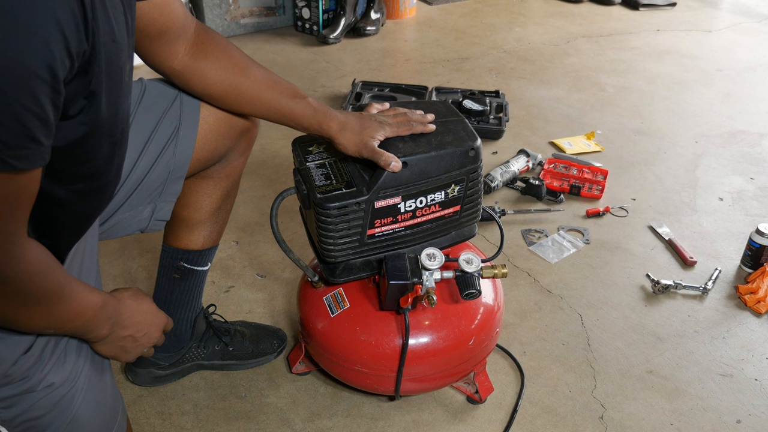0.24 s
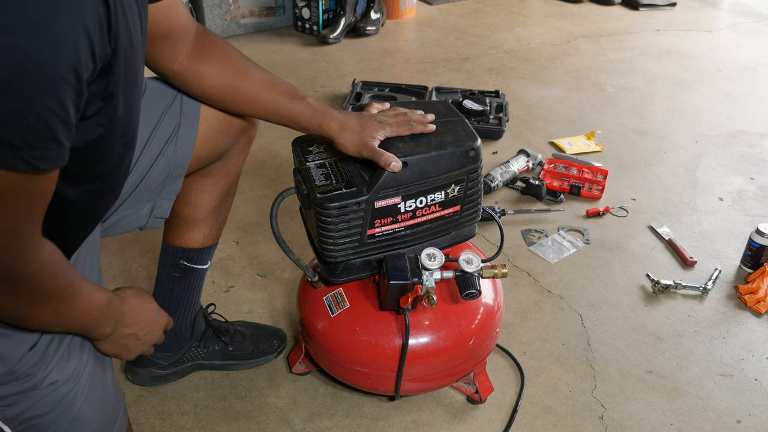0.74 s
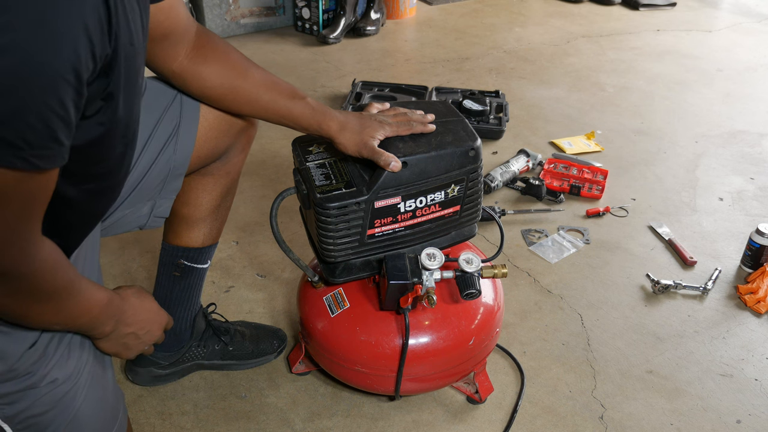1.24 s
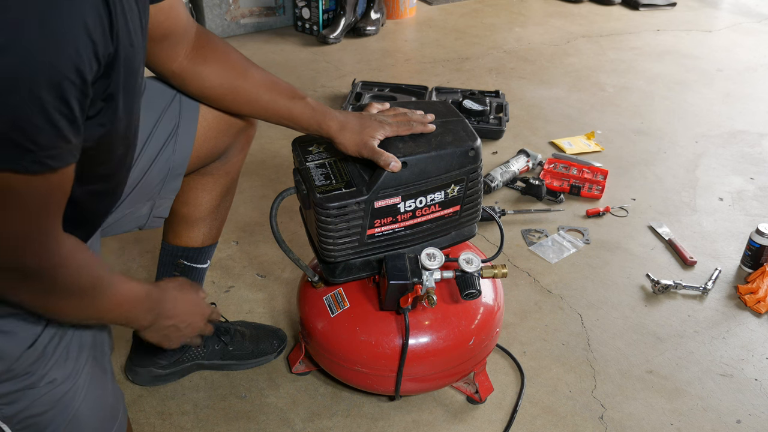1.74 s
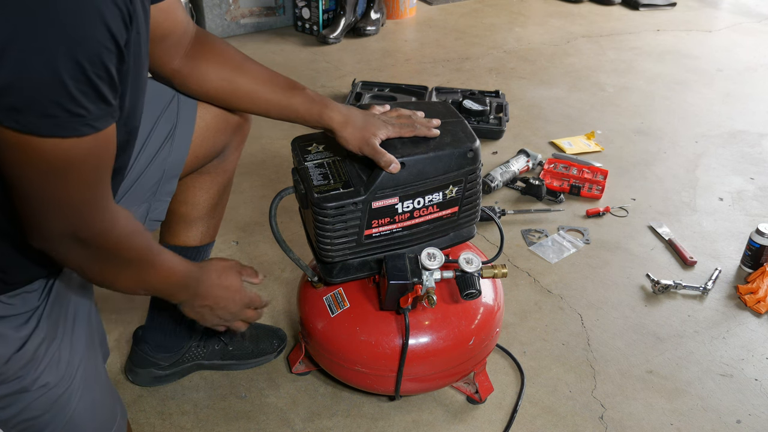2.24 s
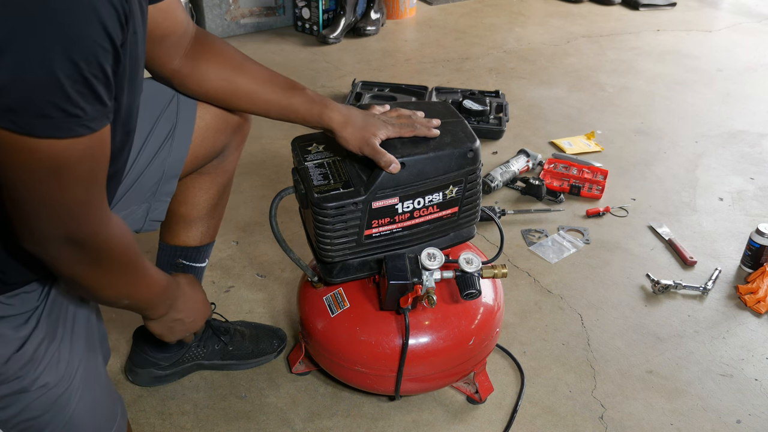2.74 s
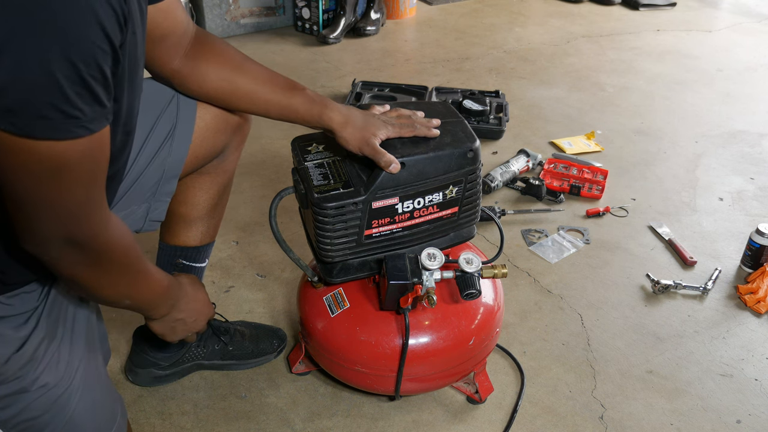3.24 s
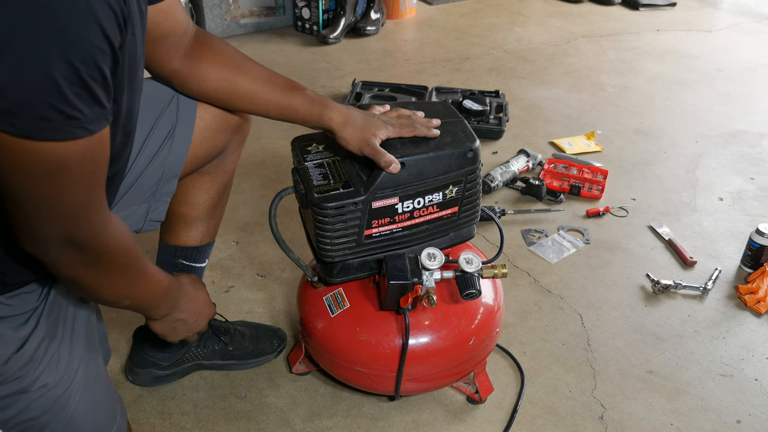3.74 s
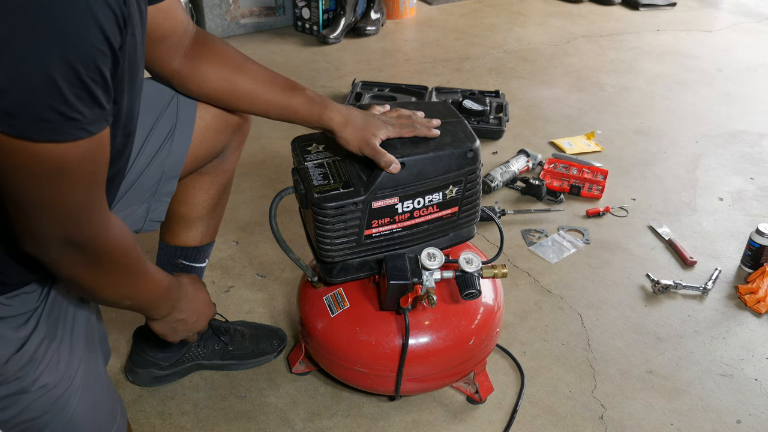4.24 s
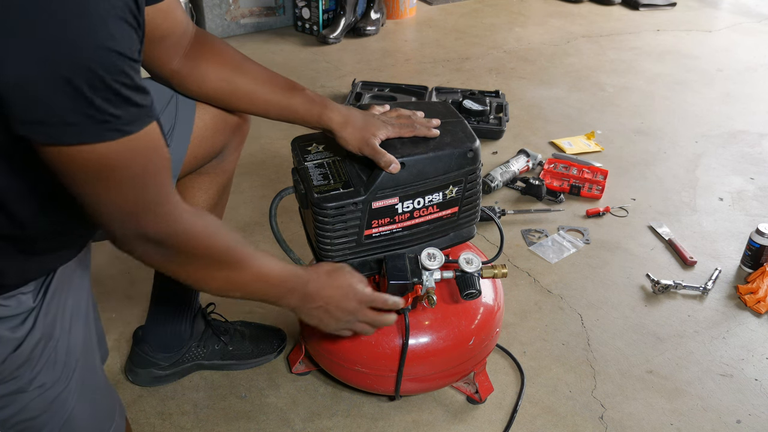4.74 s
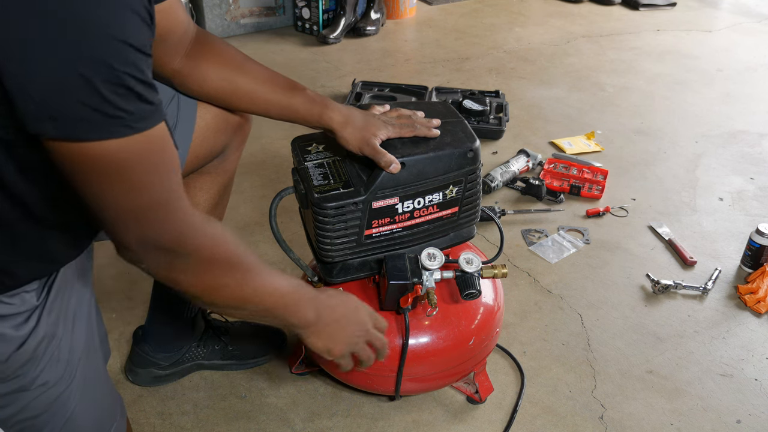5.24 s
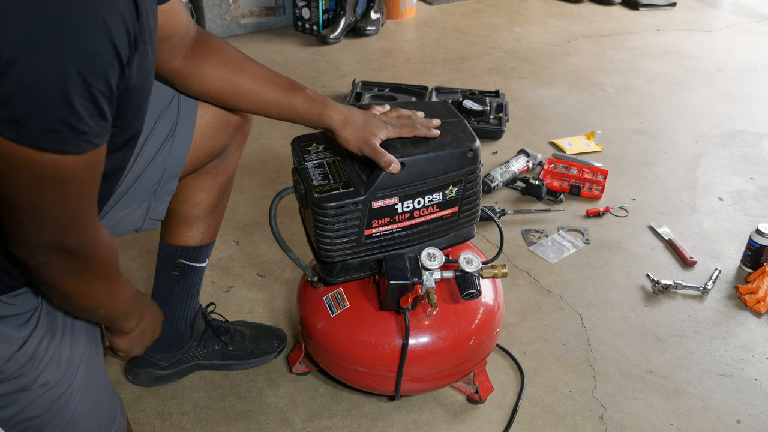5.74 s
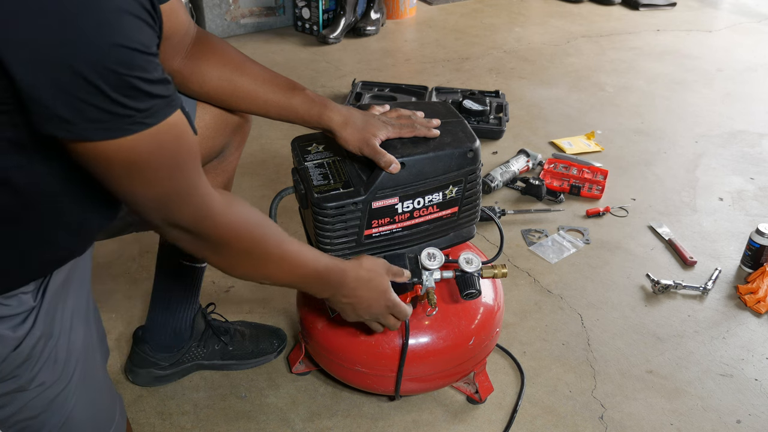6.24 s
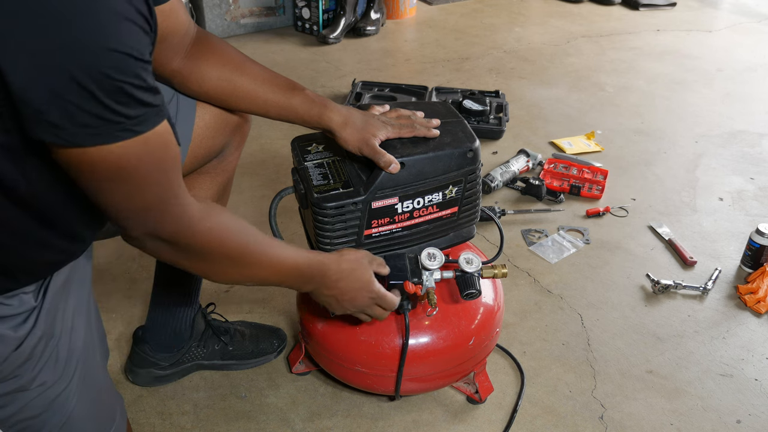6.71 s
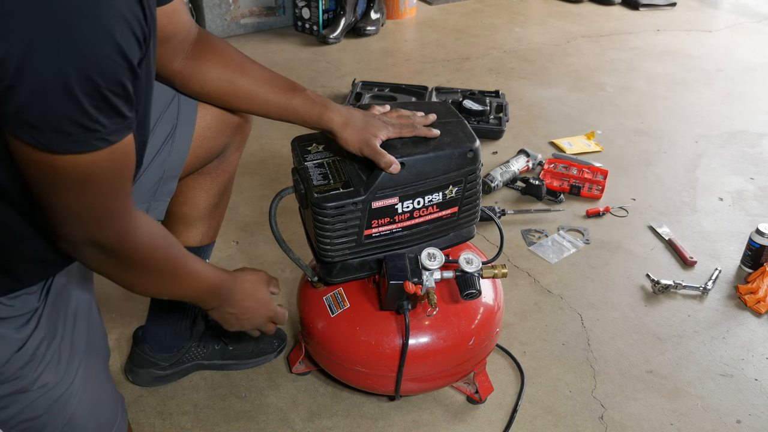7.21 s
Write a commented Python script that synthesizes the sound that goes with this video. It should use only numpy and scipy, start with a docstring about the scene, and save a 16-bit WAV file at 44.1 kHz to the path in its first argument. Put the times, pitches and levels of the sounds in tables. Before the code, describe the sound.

Steady piston buzz and motor whine from an air compressor wind down into a few chugs and a faint leaking hiss.

```python
"""Piston compressor in a garage

A small oil-free compressor fills its tank. Each crank turn repeats the same piston buzz and valve
clatter, over motor whine and air rushing in time with the strokes. At 1.9 s the sound crossfades, with
a brief dip, to a slightly slower running tone. The pump cuts off and thumps through its last strokes,
ringing the tank. A thin hiss of escaping air remains."""
import sys
import numpy as np
from scipy import signal
from scipy.fft import rfft, irfft
from scipy.io import wavfile
from scipy.ndimage import uniform_filter1d

SR = 44100
rng = np.random.default_rng(int(sys.argv[2]) if len(sys.argv) > 2 else 0)


def pcm_store(signal):
    """Save signal as 16-bit PCM."""
    levels = np.round(np.clip(np.atleast_2d(signal), -1, 1) * 32767)
    wavfile.write(sys.argv[1], SR, levels.astype(np.int16).T)


N = 329427
T = np.arange(N) / SR
FREQS_HZ = np.maximum(np.arange(N // 2 + 1) * SR / N, 1)

# piston and housing buzz, a row per crank order 1, 2, ..: first-tone level/dB, second-tone level/dB
BUZZ_LINES = [(-48, -48), (-42, -40), (-57, -46), (-41, -43), (-44, -39), (-54, -58), (-37, -39),
              (-56, -46), (-47, -41), (-43, -39), (-38, -36), (-54, -47), (-41, -53), (-46, -47),
              (-46, -42), (-34, -61), (-47, -34), (-44, -50), (-46, -38), (-50, -45), (-49, -37),
              (-44, -41), (-51, -52), (-49, -50), (-50, -45), (-39, -38), (-38, -36), (-39, -35),
              (-39, -41), (-39, -41), (-44, -43), (-39, -38), (-55, -37), (-34, -42), (-34, -39),
              (-37, -38), (-42, -41), (-37, -39), (-46, -37), (-41, -33), (-36, -39), (-41, -36),
              (-40, -34), (-45, -40), (-43, -35), (-53, -46), (-49, -47), (-36, -45), (-42, -39),
              (-38, -42), (-52, -43), (-43, -43)]
# piston rattle swells: t/s, width/s, gain/dB
RATTLE_SWELLS = [(.85, .07, 0.7), (2.17, 0.046, -1.3), (2.33, 0.064, 0), (4.65, 0.043, 0.5), (5.0, .07, -2),
                 (5.42, 0.076, 1.4), (6.02, 0.1, 1), (6.28, .09, -3)]
# valve clatter: f/Hz, density/(dB per Hz)
CLATTER_SPECTRUM = [(2200, -84), (2480, -58.5), (2720, -79), (2950, -62.5), (3300, -71.5), (3950, -67.5),
                    (4500, -66.5), (5050, -63), (5450, -75), (5620, -57), (5900, -75), (6120, -68.5),
                    (6600, -81), (10000, -78.5), (13000, -92)]
# motor and fan whine: crank order, first-tone level/dB, second-tone level/dB
WHINE_LINES = [(57, -40, -48), (58, -50, -45), (63, -44, -50), (64, -50, -47), (68, -45, -51),
               (78, -42, -49), (79, -42, -50), (83, -43, -46), (84, -40.5, -47), (86, -40.5, -47),
               (87, -46, -42), (92, -43, -48), (93, -46, -42), (96, -39, -47), (103, -42, -43),
               (105, -45, -41), (106, -36, -44), (107, -40, -39), (109, -45, -40), (123, -48, -45)]
# swells of single whine lines: crank order, t/s, width/s, gain/dB
WHINE_LINE_SWELLS = [(84, .3, .36, 6), (86, .3, .36, 5.5), (96, .36, .13, 6.5), (96, .72, .24, 4),
                     (68, .88, .42, 8)]
# rushing air: f/Hz, first-tone density/(dB per Hz), second-tone density/(dB per Hz)
RUSH_SPECTRA = [(30, -74, -76), (165, -65.5, -65), (250, -59.5, -59.5), (390, -59, -60), (530, -55.5, -56),
                (650, -61, -62.5), (1030, -64.5, -62), (1540, -57.5, -60), (1970, -52.5, -54),
                (2330, -57.5, -57), (2630, -55, -58.5), (2740, -64, -64.5), (3230, -63, -65.5),
                (4050, -60.5, -61), (4660, -58, -62.5), (4970, -56, -55.5), (5400, -63, -64.5),
                (5590, -60, -56), (5860, -66, -71), (6040, -63.5, -59.5), (6370, -67, -69),
                (6950, -74, -74.5), (10500, -72.5, -74), (11500, -83, -82), (13300, -73.5, -74.5),
                (15200, -78.5, -76.5)]
# tank and housing modes: f/Hz, level/dB, t60/s
TANK_MODES = [(105, -18, 0.042), (190, -15, 0.028), (326, -11.5, 0.37), (356, 0, 0.051), (415, 0, 0.053),
              (572, -17, .25), (744, -2, 0.19), (800, 0, 0.067), (930, 5, 0.044), (1210, 12, 0.031),
              (1830, -16, .28)]
# air chug of a slow stroke: f/Hz, density/(dB per Hz)
CHUG_SPECTRUM = [(30, -53), (100, -42), (380, -26), (600, -37), (780, -19), (1000, -46), (1250, -35),
                 (2000, -47), (3500, -68)]
# piston rocking back against trapped air: t/s, level/dB, cutoff/Hz
PISTON_REBOUNDS = [(6.727, -14.5, 430), (6.851, -9, 300)]
# clacks of the slack drive: t/s, level/dB, f/Hz
DRIVE_CLACKS = [(6.6268, -17, 1630), (6.759, -18.5, 1615)]
# air outlet resonances: f/Hz, width/Hz, level/dB
OUTLET_MODES = [(1966, 74, -55), (2520, 85, -43), (3260, 75, -52), (4410, 110, -37), (4790, 70, -40),
                (5054, 137, -26.5), (5267, 110, -30.5), (5594, 160, -34.5), (6170, 47, -44),
                (8070, 160, -52), (10700, 220, -57), (14900, 300, -49)]
# hiss of escaping air: f/Hz, density/(dB per Hz)
HISS_SPECTRUM = [(100, -99), (800, -92), (1300, -83), (2200, -75.5), (3600, -77.5), (4300, -69.5),
                 (5400, -72), (6250, -72), (6470, -82), (6800, -73.5), (7200, -85), (9000, -85.5),
                 (11200, -84.5), (11900, -88), (12200, -77), (13500, -79), (15000, -77), (15600, -84)]
# surges of escaping air: t/s, width/s, gain/dB
LEAK_SWELLS = [(1.98, 0.054, 1.5), (4.65, 0.039, 4), (4.9, 0.1, 4.5)]
# unloader puffs: peak t/s, level/dB, rise/s, fall/s
UNLOADER_PUFFS = [(6.71, -25.5, 0.2, 0.14), (6.765, -22, 0.0099, 0.014)]
# level of the left-right difference: f/Hz, level/dB
SIDE_SPECTRUM = [(100, -21), (500, -23), (1200, -23.5), (2200, -21.5), (5000, -21.5), (8500, -16.5)]
# room noise: f/Hz, density/(dB per Hz)
ROOM_SPECTRUM = [(25, -111), (55, -98), (90, -79), (160, -96), (400, -86), (800, -99), (8000, -110)]
# room hum: f/Hz, level/dB
ROOM_HUM = [(576.0, -65.5)]

START_HZ, SAG_HZ_PER_S, SECOND_DROP_HZ = 46.18, .047, .57  # crank speed
CROSSFADE_S, CROSSFADE_WIDTH_S = 1.9, .019  # first running tone to second
DIP_S, DIP_WIDTH_S, DIP_DB = 1.873, .11, -4.5  # brief level dip
CUT_S, COAST_S = 6.36, .434
COAST_EXP, LOUDNESS_EXP, SLACK_EXP = 1.4, .77, 2.6
PUMP_DB, WHINE_FIRST_DB, WHINE_DB_PER_S = -.07, 1, .5
STROKE_DB, STROKE_CUTOFF_HZ, STROKE_RISE_S, REBOUND_RISE_S = -19.5, 7040, .0037, .008
LEAK_FIRST_DB, LEAK_SECOND_DB, LEAK_REST_DB = -27, -5.5, .45
LOWPASS_HZ = 15550


def pump(blend, pace, turns):
    """Piston buzz, valve clatter, whine and pulsing air, locked to the crank."""
    turns = turns + (.00034 + .00035 * blend) * walk(17)  # stroke jitter
    drive = pace ** SLACK_EXP  # slack drive: tones die before the rush
    rattle = undb(swells_db(RATTLE_SWELLS))
    air = pulsing_air(turns, rattle)
    out = drive ** 2 * motor_whine(turns, blend)
    for tone, share in enumerate([1 - blend, blend]):
        buzz = piston_buzz(turns, np.array(BUZZ_LINES)[:, tone], rattle)
        valves = valve_clatter(turns)
        rush = undb(-.5) * colour(air, np.array(RUSH_SPECTRA)[:, [0, tone + 1]])
        out += np.sqrt(share) * (drive * buzz + drive ** 2 * valves + rush)
    return out * pace ** LOUDNESS_EXP * undb(PUMP_DB + DIP_DB * swell(DIP_S, DIP_WIDTH_S))


def crank_motion():
    """The crank slows as the tank fills and coasts to rest after the cut; the second tone is slower."""
    blend = .5 + .5 * np.tanh((T - CROSSFADE_S) / CROSSFADE_WIDTH_S)  # 0 first tone, 1 second
    pace = np.clip(1 - (T - CUT_S) / COAST_S, 0, 1) ** COAST_EXP  # 1 running, 0 at rest
    speed_hz = (START_HZ - SAG_HZ_PER_S * T - SECOND_DROP_HZ * blend) * pace
    turns = np.cumsum(speed_hz) / SR - .21  # first blow at turns = 0
    return blend, pace, turns


def piston_buzz(turns, levels_db, rattle):
    """Piston blows shake the housing: smooth low orders, sharply pulsed middle orders."""
    low, middle = np.arange(1, 24), np.arange(24, len(levels_db) + 1)
    hum = crank_wave(turns, low, undb(levels_db[low - 1]), lambda turn: np.sqrt(knock(turn)), passes=3)
    hum *= undb(.5 * walk(20))
    blows = crank_wave(turns, middle, undb(levels_db[middle - 1]), knock, passes=5)
    return hum + blows * rattle * undb(.72 * walk(30))


def knock(turns):
    """Envelope: piston blow at top of stroke, then a weak rebound."""
    return 1 + 2 * gate(turns, 0, .09) + .35 * gate(turns, .33, .1)


def valve_clatter(turns):
    """Valves rattle each turn, filling the high orders between the whine lines."""
    crank_hz = START_HZ - SECOND_DROP_HZ
    orders = np.setdiff1d(np.arange(len(BUZZ_LINES) + 1, 300), [row[0] for row in WHINE_LINES])
    gains = spectrum_at(orders * crank_hz, CLATTER_SPECTRUM) * np.sqrt(crank_hz)
    gains *= undb(.69 * rng.standard_normal(len(orders)))
    jittered = turns + .00072 * walk(50)
    return crank_wave(jittered, orders, gains, valve_surge, passes=1) * undb(2.1 * walk(50))


def valve_surge(turns):
    """Envelope: air through the exhaust valve, then more softly through the intake."""
    return 1 + .59 * gate(turns, 0, .11) + .47 * gate(turns, .63, .091)


def pulsing_air(turns, rattle):
    """Noise pulsed by the housing's knock in the midrange, by the valves elsewhere."""
    mid_share = 1 / (1 + (np.log2(FREQS_HZ / 1400) / .85) ** 4)
    shaken = rfft(unit(noise() * knock(turns) ** .62) * rattle)
    blown = rfft(unit(noise() * valve_surge(turns)))
    air = irfft(shaken * np.sqrt(mid_share) + blown * np.sqrt(1 - mid_share), N)
    return early_echoes(air * undb(.5 * walk(27.2)), wet_db=-4)


def motor_whine(turns, blend):
    """Motor and fan lines, each fluttering on its own; they grow as the tank fills."""
    level_db = (1 - blend) * WHINE_FIRST_DB + blend * WHINE_DB_PER_S * (T - CROSSFADE_S)
    flutter = .09 + .18 * blend
    out = 0
    for order, first_db, second_db in WHINE_LINES:
        swell_db = swells_db(row[1:] for row in WHINE_LINE_SWELLS if row[0] == order)
        phase = 2 * np.pi * (order * turns % 1 + rng.random()) + flutter * walk(15)
        line = np.sin(phase) * (1 + flutter * walk(15))
        out += line * undb(first_db + blend * (second_db - first_db) + swell_db)
    return np.sqrt(2) * out * undb(level_db)


def run_down(pace, turns):
    """Coasting strokes and rebounds chug and ring the tank, duller as the crank slows."""
    strokes = []
    for i in np.flatnonzero((np.diff(np.floor(turns)) > 0) & (T[:-1] > CUT_S)):
        slack_db = 20 * np.log10(1 - pace[i] ** SLACK_EXP)  # strokes emerge as the drive slackens
        strokes.append((T[i], STROKE_DB + slack_db, STROKE_CUTOFF_HZ * pace[i], STROKE_RISE_S))
    strokes += [(*row, REBOUND_RISE_S) for row in PISTON_REBOUNDS]
    tank, gusts, t = np.zeros(N), np.zeros(N), T[:SR // 4]
    for start_s, stroke_db, cutoff_hz, rise_s in strokes:
        push = lambda hz: undb(stroke_db) / (1 + (hz / cutoff_hz) ** 3)
        gust = np.exp(-t / .014) * (1 - np.exp(-t / rise_s))
        add(gusts, start_s, gust * undb(-2.5) * push(1000))
        for hz, db, t60_s in TANK_MODES:
            mode = ring(hz * (1 + .0073 * rng.standard_normal()), t60_s, rise_s)
            add(tank, start_s + .00248 * rng.random(), mode * undb(db - 5.5) * push(hz))
    chugs = colour(noise() * gusts, CHUG_SPECTRUM)
    return early_echoes(tank + chugs + drive_clacks(), wet_db=-9, t60_s=.2)


def drive_clacks():
    """The slack drive clacks: two short modes per hit."""
    out = np.zeros(N)
    for start_s, db, hz in DRIVE_CLACKS:
        clack = ring(hz, t60_s=.023, rise_s=.0032) + .2 * ring(hz * 1.2, t60_s=.025, rise_s=.002)
        add(out, start_s, clack * undb(db + 7.5))
    return out


def escaping_air(blend, pace):
    """A sputtering jet hisses and whistles in its outlet; the unloader puffs at the stop."""
    running_db = LEAK_FIRST_DB + blend * (LEAK_SECOND_DB - LEAK_FIRST_DB) + swells_db(LEAK_SWELLS)
    leak_db = pace * running_db + (1 - pace) * LEAK_REST_DB
    puffs = sum(undb(db) * np.exp(-np.maximum((at_s - T) / rise_s, (T - at_s) / fall_s))
                for at_s, db, rise_s, fall_s in UNLOADER_PUFFS)
    jet = unit(noise() * undb(1.8 * walk(110) + walk(15)))
    spray = unit(noise() * undb(walk(90)))
    hiss = colour(early_echoes(spray, wet_db=.5), HISS_SPECTRUM)
    leak = (resonate(jet, OUTLET_MODES) + hiss) * undb(leak_db)
    return leak + resonate(jet, [(5500, 590, 0)]) * puffs


def early_echoes(x, wet_db, t60_s=.081, count=40):
    """Reflections off floor and clutter ripple the spectrum."""
    lags_s = rng.uniform(.001, .035, count)
    taps = rng.standard_normal(count) * undb(-60 * lags_s / t60_s)
    response = np.zeros(SR // 10)
    response[(lags_s * SR).astype(int)] = undb(wet_db) * taps / np.linalg.norm(taps)
    response[0] = 1
    return signal.fftconvolve(x, response / np.linalg.norm(response))[:N]


def stereo_width(x, t60_s=.15):
    """Faint wavering stereo width: a decorrelated side signal."""
    t = T[:SR // 4]
    smear = rng.standard_normal(len(t)) * undb(-60 * t / t60_s)
    side = signal.fftconvolve(x * walk(20), smear / np.linalg.norm(smear))[:N]
    return irfft(rfft(side) * spectrum_at(FREQS_HZ, SIDE_SPECTRUM), N)


def garage():
    """Quiet room noise and a faint hum."""
    hum = sum(np.sqrt(2) * undb(db) * np.sin(2 * np.pi * hz * T) for hz, db in ROOM_HUM)
    return colour(noise(), ROOM_SPECTRUM) + hum


def crank_wave(turns, orders, gains, shape, passes, size=4096):
    """One-turn wavetable read at crank speed; each pass bends its phases toward the envelope shape."""
    envelope = shape(np.arange(size) / size)
    magnitudes = np.zeros(size)
    magnitudes[orders] = gains
    cycle = np.exp(2j * np.pi * rng.random(size))
    for _ in range(passes):
        shaped = envelope * np.exp(1j * np.angle(cycle))
        cycle = np.fft.ifft(magnitudes * np.exp(1j * np.angle(np.fft.fft(shaped))))
    cycle = cycle.real * size * np.sqrt(2)
    return np.interp(turns % 1 * size, np.arange(size + 1), np.append(cycle, cycle[0]))


def ring(hz, t60_s, rise_s):
    """Struck mode, 1 s long; soft contact gives a slow rise."""
    t = T[:SR]
    envelope = np.exp(-np.log(1000) * t / t60_s) * (1 - np.exp(-(t / rise_s) ** 2))
    return np.sin(2 * np.pi * hz * t) * envelope


def resonate(x, modes):
    """Double-pole resonances: f/Hz, width/Hz, level/dB."""
    response = 0
    for hz, width_hz, db in modes:
        pole = 1 / (1 + 1j * (FREQS_HZ - hz) / (.75 * width_hz))
        response += pole ** 2 * undb(db) * np.sqrt(SR / (np.pi * .75 * width_hz))
    return irfft(rfft(x) * response, N)


def colour(x, points):
    """Shape white noise: f/Hz, density/(dB per Hz)."""
    return irfft(rfft(x, N) * spectrum_at(FREQS_HZ, points) * np.sqrt(SR / 2), N)


def spectrum_at(hz, points):
    """Gain at hz, interpolated over log frequency."""
    points_hz, db = np.transpose(points)
    return undb(np.interp(np.log(hz), np.log(points_hz), db))


def gate(turns, at, width):
    """Gaussian window, once a turn."""
    return np.exp(-(((turns - at + .5) % 1 - .5) / width) ** 2)


def swell(at_s, width_s):
    """Gaussian bump, peak 1."""
    return np.exp(-((T - at_s) / width_s) ** 2)


def swells_db(rows):
    """Sum of bumps: t/s, width/s, gain/dB."""
    return sum(db * swell(at_s, width_s) for at_s, width_s, db in rows)


def walk(rate_hz):
    """Smooth random drift, spread 1."""
    times_s = np.arange(0, T[-1] + 1, 1 / (10 * rate_hz))
    steps = rng.standard_normal(len(times_s))
    smooth = uniform_filter1d(uniform_filter1d(steps, size=5), size=5)
    return unit(np.interp(T, times_s, smooth))


def add(out, start_s, sound):
    part = out[int(start_s * SR):][:len(sound)]
    part += sound[:len(part)]


def noise():
    return rng.standard_normal(N)


def unit(x):
    return x / np.std(x)


def undb(db):
    return np.exp(np.asarray(db) * (np.log(10) / 20))


def scene():
    """Compressor in the centre with faint wavering stereo width, over room noise."""
    blend, pace, turns = crank_motion()
    machine = pump(blend, pace, turns) + run_down(pace, turns) + escaping_air(blend, pace)
    side = stereo_width(machine)
    return machine + garage() + np.array([side, -side])


def record(dry):
    """Steep zero-phase low-pass."""
    return signal.sosfiltfilt(signal.ellip(10, .05, 60, LOWPASS_HZ, fs=SR, output="sos"), dry)


dry = scene()
out = record(dry)
pcm_store(out)
```